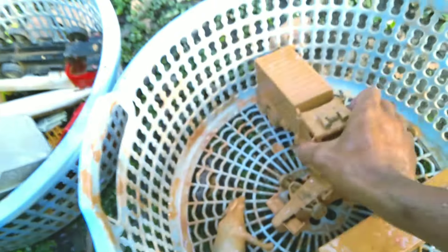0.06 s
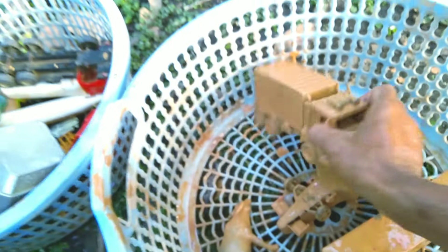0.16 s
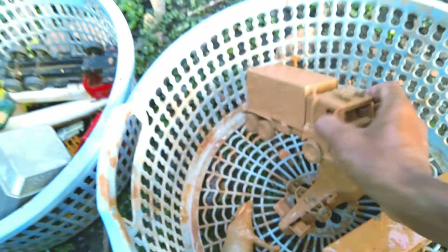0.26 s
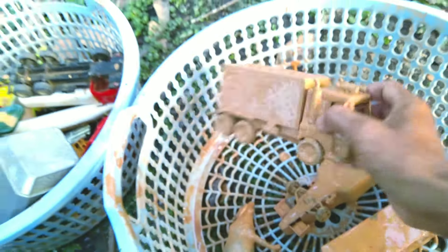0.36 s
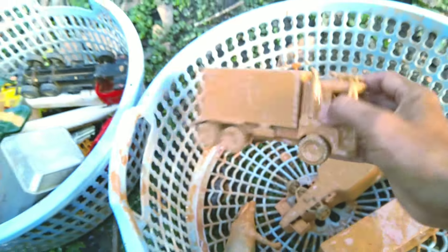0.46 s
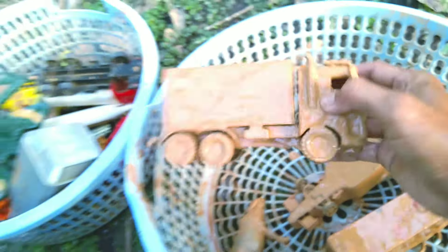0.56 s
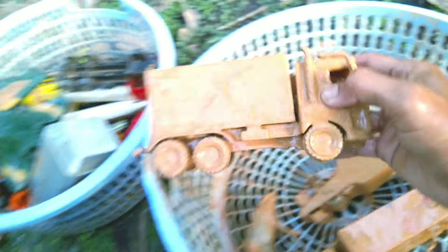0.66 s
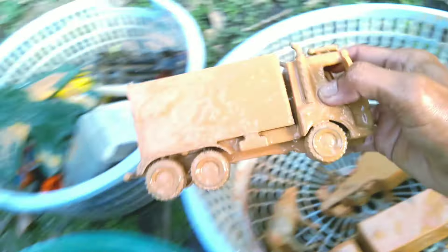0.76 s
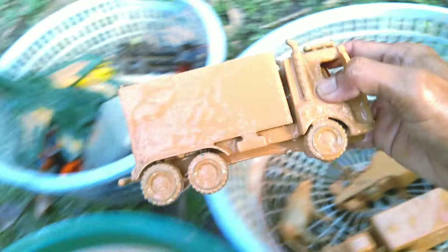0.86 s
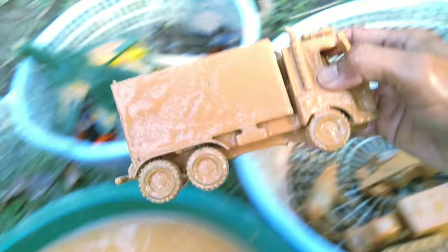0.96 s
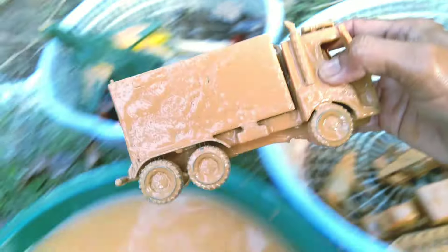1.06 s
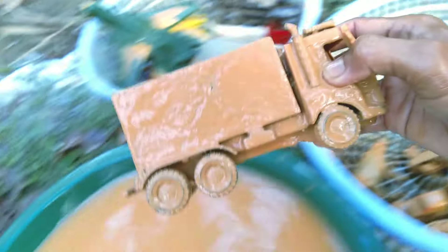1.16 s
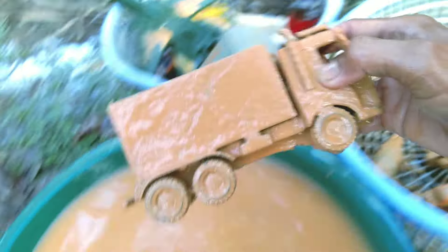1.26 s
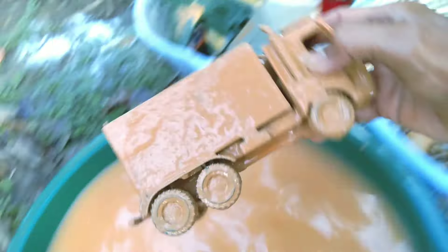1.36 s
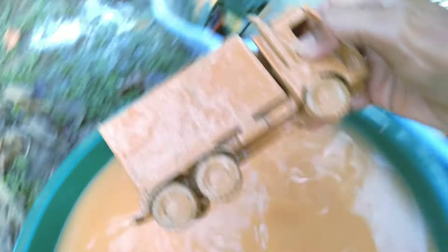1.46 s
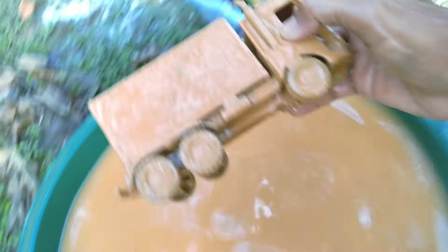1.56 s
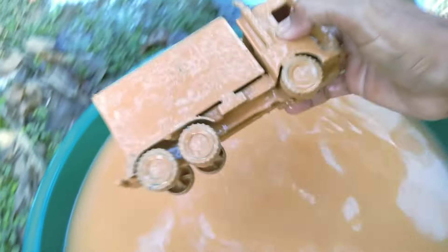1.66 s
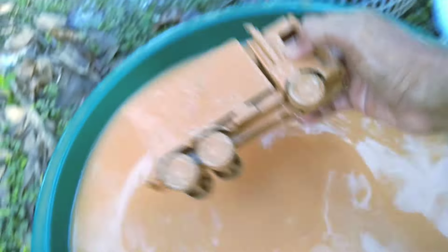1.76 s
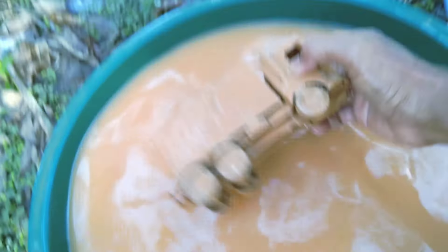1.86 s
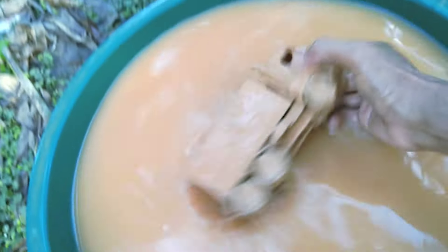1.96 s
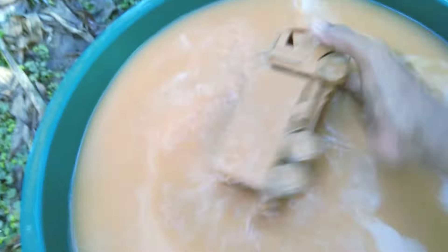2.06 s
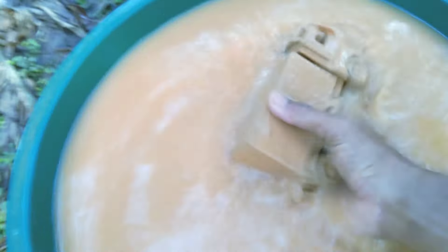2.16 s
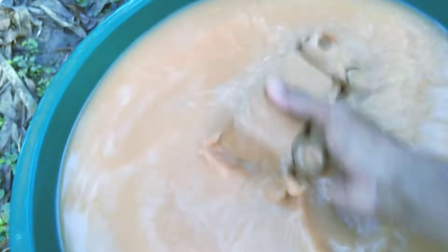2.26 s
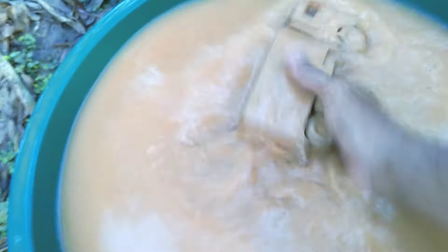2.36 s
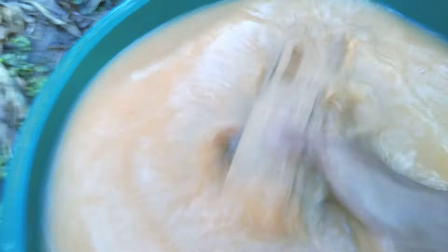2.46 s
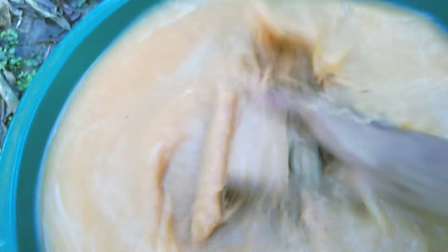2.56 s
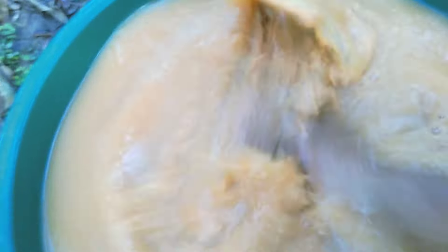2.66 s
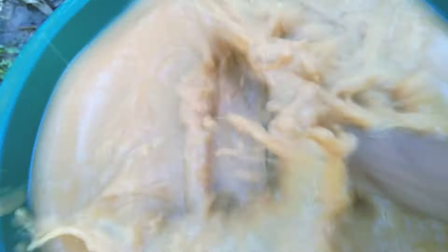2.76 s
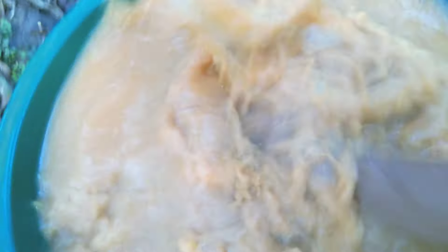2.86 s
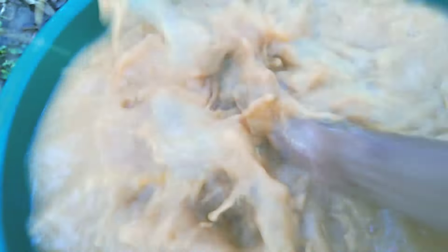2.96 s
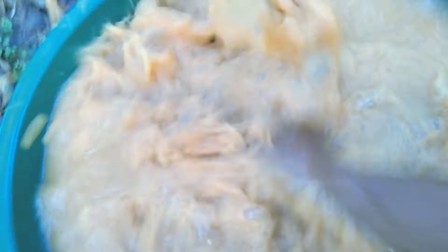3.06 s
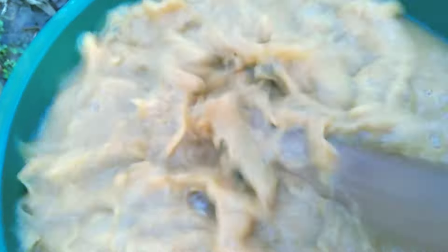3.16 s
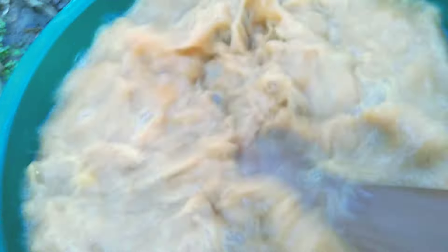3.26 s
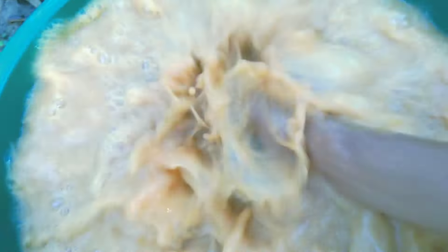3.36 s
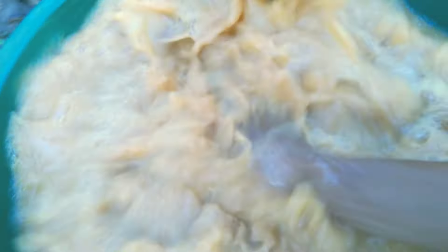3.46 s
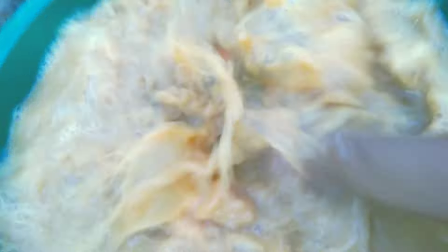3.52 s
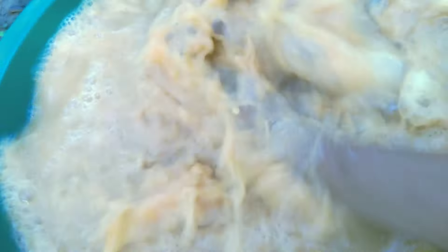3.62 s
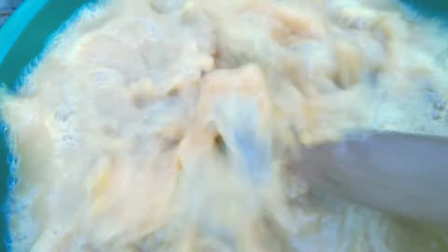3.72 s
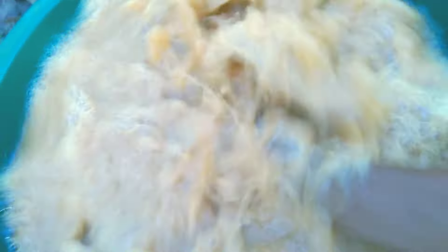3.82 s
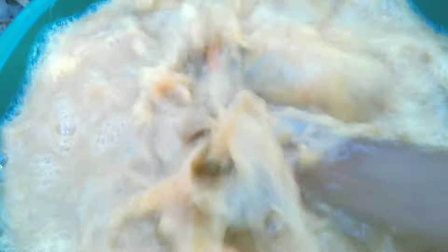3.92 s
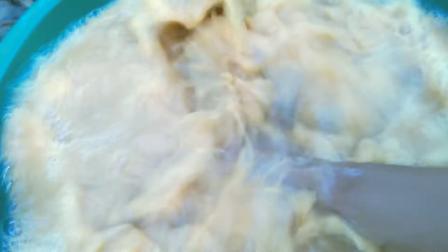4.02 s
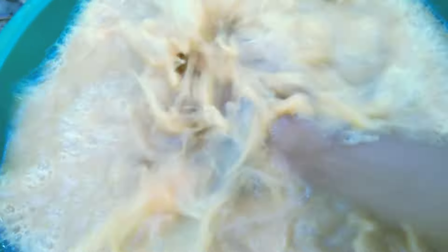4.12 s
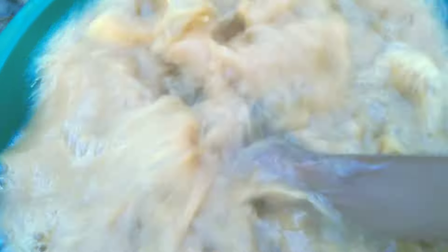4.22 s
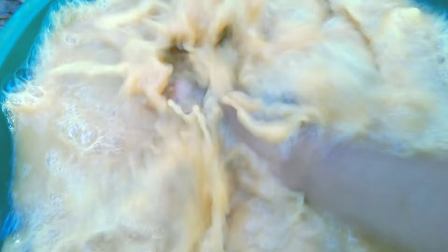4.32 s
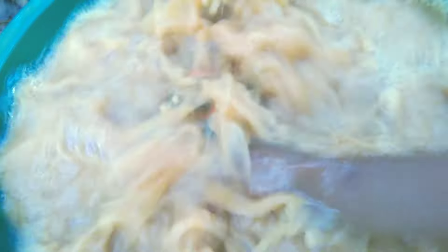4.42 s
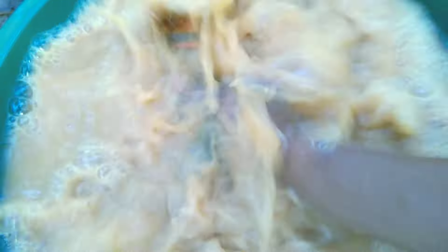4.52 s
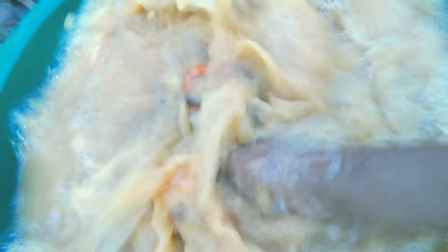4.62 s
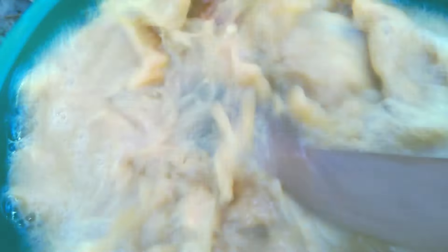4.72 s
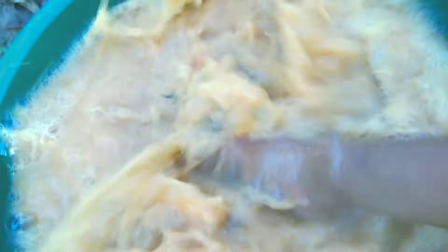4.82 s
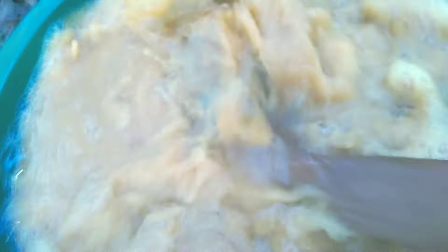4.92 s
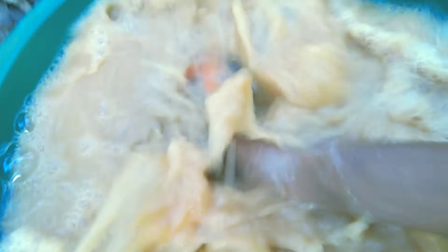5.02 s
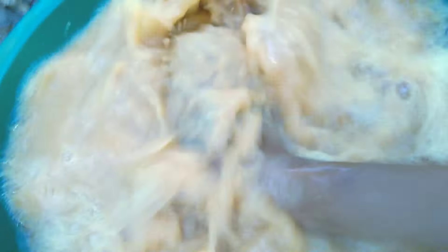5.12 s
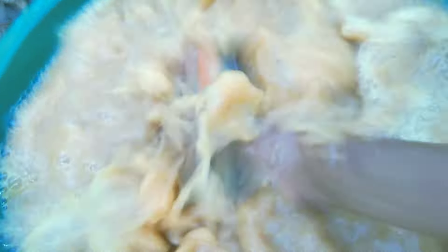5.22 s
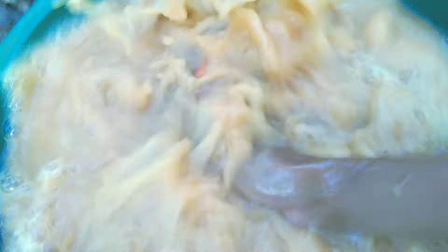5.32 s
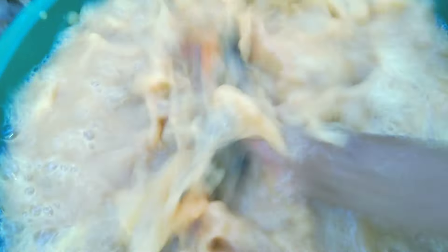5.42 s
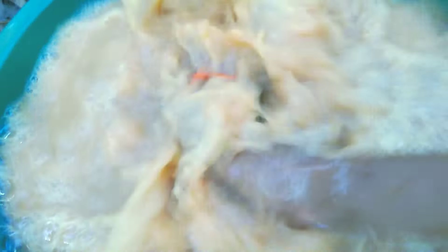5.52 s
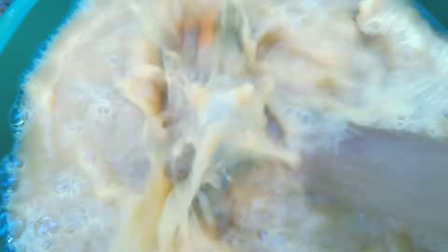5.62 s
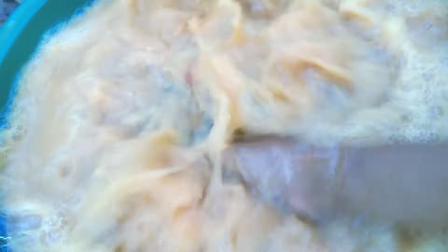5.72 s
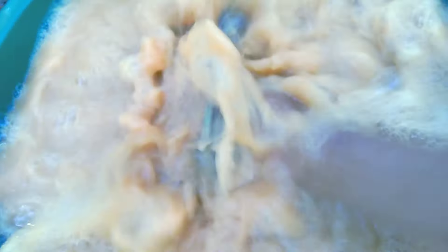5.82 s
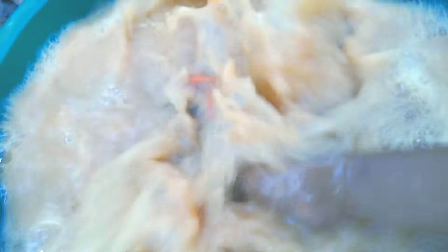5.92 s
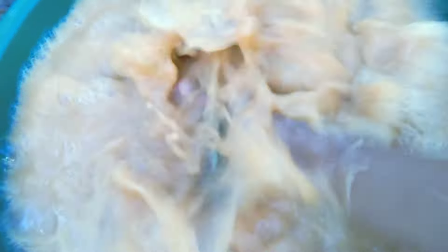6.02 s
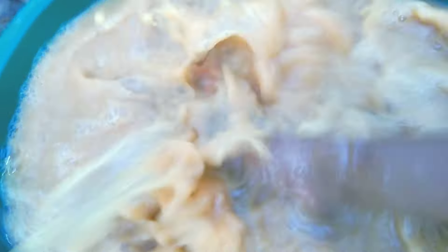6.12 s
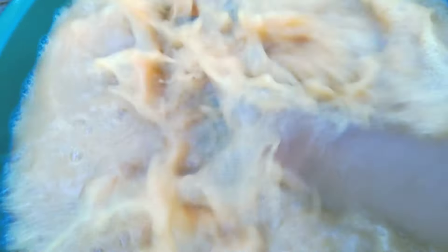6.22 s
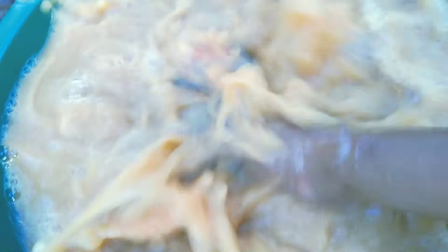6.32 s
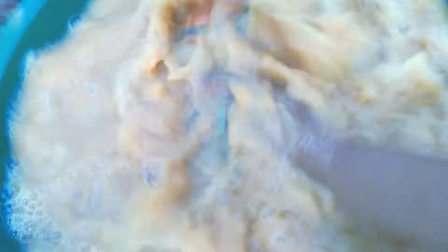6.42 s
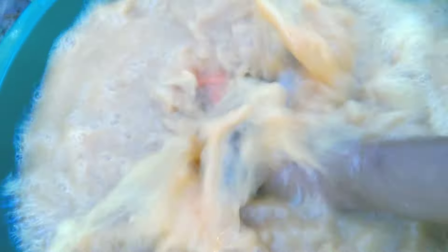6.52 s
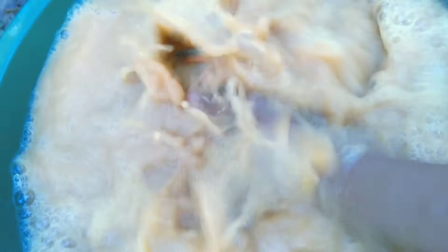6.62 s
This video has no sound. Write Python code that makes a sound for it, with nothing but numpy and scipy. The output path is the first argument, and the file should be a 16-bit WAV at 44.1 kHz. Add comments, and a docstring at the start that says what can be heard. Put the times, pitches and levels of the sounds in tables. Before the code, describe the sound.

A soft plastic scrape with one small snag opens over far birdsong and low outdoor rumble. After two seconds of near calm, a sharp slap of water marks the dip, followed by light drips and glugs. Then vigorous scrubbing in a full basin takes over, dense bubbling, heavy sloshes and hissing spray in uneven bursts, close, loud and mono, still going when it stops.

```python
"""Outdoors, at a basin: a muddy plastic toy is dragged from a basket, dipped and shaken. Close to the single
microphone, slaps, glugs and spray are damped bubble tones mixed with coloured noise. The basket's drag is
patchy noise with one snag. Far off, small birds are gliding sines heard through echoes. Behind them lie rumble,
a far rush, brief low tones and the high buzz of an insect flying by."""
import sys
import numpy as np
from scipy import signal
from scipy.fft import rfft, irfft, next_fast_len
from scipy.io import wavfile
from scipy.ndimage import uniform_filter1d, map_coordinates

SR = 44100
rng = np.random.default_rng(int(sys.argv[2]) if len(sys.argv) > 2 else 0)


def generate_wav(sig):
    """Save sig (samples, or channels by samples) to the path in sys.argv[1] as 16-bit PCM at SR."""
    pcm = np.round(np.clip(np.atleast_2d(sig).T, -1, 1) * 32767).astype(np.int16)
    wavfile.write(sys.argv[1], SR, pcm)


N = 294588
T = np.arange(N) / SR

# Unrest of the water, before trims and flutter:
# [t/s, gurgle level/dB, splash level/dB, spray level/dB]
WATER_UNREST = [(2.01, -62, -53, -55), (2.05, -50.5, -50.5, -41), (2.16, -50, -50, -53),
                (2.21, -40, -51, -52), (2.27, -39, -43, -48), (2.33, -42, -38, -46),
                (2.43, -44, -45.5, -57), (2.55, -40.5, -34.5, -53), (2.61, -41, -40, -46),
                (2.66, -35.5, -32, -38), (2.72, -32, -32, -42), (2.83, -28.5, -24, -27.5),
                (3.0, -22, -28, -24.5), (3.12, -29, -28.5, -30), (3.35, -23, -25.5, -27.5),
                (3.8, -22, -23, -25.5), (4.3, -24, -26.5, -26.5), (4.46, -23.5, -24.5, -29),
                (4.74, -23, -24, -27), (5.04, -24, -25.5, -25), (5.42, -23, -23, -26.5),
                (5.9, -22.5, -24, -24), (6.68, -24, -24.5, -28)]


def water():
    """Water shaken in the basin: noise and bubbles share one unrest, and splash and spray share spurts."""
    gurgle_gain, splash_gain, spray_gain = gains(WATER_UNREST)
    sheet_splash, sheet_spray = sheets()
    spurt = spurts(count=800, last=0.0014, scatter_db=2.5)
    out = surge(gurgle_gain) + heaves() + gurgle(gurgle_gain)
    out += splash(np.hypot(splash_gain, sheet_splash), spurt)
    out += spray(np.hypot(spray_gain, sheet_spray), spurt)
    return out + slaps() + glugs() + slosh()


# Drops and sheets landing: [t/s, nominal peak level/dB, f/Hz]
LANDINGS = [(2.0161, -0.5, 3400), (2.0197, -10, 2050), (2.0587, -29, 7490), (2.0807, -27, 4500),
            (2.0946, -24, 3900), (2.1161, -24, 1490), (2.1486, -32, 4700), (2.1665, -15, 1960),
            (2.1847, -9, 7600), (2.1904, -13, 1810), (2.2338, -23, 5360), (2.2518, -14, 2380),
            (2.2668, -5.5, 2640), (2.2796, -12, 7960), (2.3156, -15, 1380), (2.364, -23, 4180),
            (2.4157, -30, 5200), (2.4673, -24, 4100), (2.5127, -20, 3680), (2.5277, -15.5, 3140),
            (2.535, -13, 3240), (2.5636, -8.5, 1990), (2.711, -7, 5600), (2.73, -7, 7250),
            (2.7444, -3.5, 3150), (2.75, -2, 3140), (2.7623, -15, 8030), (2.778, -3.5, 1480),
            (2.865, -7.5, 1690), (2.9077, -4.5, 1440), (2.9402, -13, 4030), (2.957, -2, 2460),
            (2.976, -1, 7230), (2.995, 2, 5560), (3.0587, 2, 1900), (3.0708, 0, 2540), (3.1517, -1, 2120),
            (3.1694, -5, 6300), (3.2145, -2.5, 7100), (3.247, -7, 2040), (3.269, -4, 1490),
            (3.3182, -6, 2590), (3.3503, -7, 1400), (3.4638, -0.5, 1580), (3.5842, -9, 5230),
            (3.6195, -10, 3600), (3.6737, -2, 1530), (3.8869, 1.5, 7830), (3.924, -6, 1990),
            (3.948, -3.5, 7460), (4.013, -5, 6600), (4.0726, -21, 1460), (4.212, -2, 1420),
            (4.2564, 0, 1730), (4.3016, -10, 1900), (4.3904, -18, 1710), (4.4834, -2, 7460),
            (4.5002, -7, 1710), (4.562, -5.5, 5530), (4.6019, -11, 7500), (4.6843, -4, 2340),
            (4.7574, -4, 7000), (4.785, -12, 1420), (4.87, -19, 1470), (4.9448, -3.5, 6960),
            (5.0372, -6, 2180), (5.1313, -4, 2180), (5.1943, -1, 1970), (5.2068, -5, 2090),
            (5.233, -9, 2130), (5.268, -7, 1900), (5.4316, -2, 1880), (5.5455, -6, 4660),
            (5.5628, -7, 3570), (5.577, -8, 2020), (5.747, -14, 3560), (5.8164, -24, 3420),
            (5.8845, -7.5, 3000), (6.0056, -0.5, 1630), (6.0312, -8, 3740), (6.076, -5.5, 3200),
            (6.1363, -9, 2130), (6.2136, -4, 4200), (6.2305, -0.5, 3440), (6.2977, -1.5, 3760),
            (6.339, -6, 2040), (6.4203, -8, 1700), (6.4617, -1.5, 7200), (6.5078, -0.5, 7500),
            (6.5715, -2.5, 7670)]


def slaps():
    """A landing drop rings briefly inside a puff of noise."""
    ring_t60 = 0.011  # s
    rows = [(*row, ring_t60) for row in LANDINGS]
    dry_slaps = bursts(rows, cycles=90, swell=1.0, tone_db=-4.5, hiss_db=-4.5)
    return filtered(dry_slaps, lambda f: band(900, 8500)(f) ** 0.68)


# Large bubbles: [t/s, nominal peak level/dB, f/Hz, t60/s]
LARGE_BUBBLES = [(2.038, -25, 721, 0.04), (2.091, -23.5, 540, 0.039), (2.125, -30.5, 786, 0.044),
                 (2.204, -20, 703, 0.046), (2.236, -23, 394, 0.048), (2.267, -11, 620, 0.043),
                 (2.314, -17.5, 1170, 0.031), (2.327, -24, 440, 0.048), (2.364, -24, 530, 0.043),
                 (2.631, -21, 824, 0.039), (2.662, -15.5, 410, 0.048), (2.716, -12, 1190, 0.048),
                 (2.747, -18, 1010, 0.066), (2.813, -10.5, 590, 0.039), (2.909, -11, 745, 0.057),
                 (2.962, -6, 885, 0.034), (3.024, -6, 610, 0.051), (3.048, -11, 840, 0.055),
                 (3.132, -11, 603, 0.036), (3.26, -11.5, 885, 0.048), (3.311, -31, 900, 0.06),
                 (3.39, -9, 620, 0.043), (3.547, -4.5, 640, 0.042), (3.656, -20, 600, 0.048),
                 (3.701, -13, 660, 0.048), (3.737, -7, 410, 0.083), (3.887, -6.5, 1050, 0.029),
                 (3.975, -4.5, 545, 0.043), (4.106, -9.5, 940, 0.048), (4.152, -7, 558, 0.063),
                 (4.188, -5, 865, 0.035), (4.213, -5, 480, 0.04), (4.257, -3.5, 787, 0.04),
                 (4.303, -3, 530, 0.043), (4.342, -3.5, 540, 0.06), (4.373, -1, 477, 0.042),
                 (4.391, -6.5, 824, 0.042), (4.485, -8, 694, 0.042), (4.527, -7, 496, 0.046),
                 (4.678, -7.5, 403, 0.06), (4.714, -4.5, 580, 0.042), (4.74, -4, 810, 0.032),
                 (4.772, -11, 480, 0.053), (4.841, -8.5, 860, 0.04), (4.894, -8.5, 656, 0.065),
                 (5.036, -10.5, 893, 0.041), (5.081, -5, 582, 0.041), (5.126, -6, 647, 0.038),
                 (5.266, -3.5, 638, 0.039), (5.331, -9.5, 973, 0.039), (5.422, -7.5, 468, 0.037),
                 (5.449, -4.5, 636, 0.045), (5.502, -10, 815, 0.058), (5.562, -15, 1023, 0.054),
                 (5.621, -6.5, 806, 0.05), (5.701, -4, 420, 0.048), (5.814, -5, 445, 0.048),
                 (5.972, -10.5, 886, 0.045), (6.002, -7, 625, 0.038), (6.131, -9, 900, 0.067),
                 (6.163, -9.5, 710, 0.053), (6.219, -12.5, 373, 0.067), (6.264, -5.5, 615, 0.04),
                 (6.326, -7.5, 610, 0.036), (6.407, -10, 646, 0.069), (6.53, -6.5, 770, 0.039),
                 (6.576, -10, 410, 0.061), (6.604, -8.5, 640, 0.053), (6.67, -6, 427, 0.048)]


def glugs():
    """A large bubble sounds as a damped tone of rising pitch with a little noise."""
    return bursts(LARGE_BUBBLES, cycles=60, swell=1.7, tone_db=-0.5, hiss_db=-12)


def gurgle(gain):
    """Mid-sized bubbles over noise; each large bubble stirs up more of them."""
    stirred = swells(LARGE_BUBBLES, over_db=-17, rise=0.0035, fall=0.015)
    swarm = bubbles(count=3400, hz=760, spread=0.4006, cycles=16.1, scatter_db=3.0, size=2000)
    noise = hiss(water_colour(314, 1940), patchy_db=6.5)
    flutter = amp(-1.5 + 1.55 * wobble(40) + 0.8 * wobble(13))
    return np.hypot(gain, stirred) * flutter * (amp(-2.5) * swarm + amp(-3) * noise)


def splash(gain, spurt):
    """Small bubbles and brighter noise, thrown up in spurts."""
    swarm = bubbles(count=7000, hz=2732, spread=0.4845, cycles=15, scatter_db=4.0, size=600)
    noise = hiss(water_colour(1050, 7500), patchy_db=2)
    thrown = gain * amp(-1.5 + 1.1 * wobble(22)) * (0.97 + 0.32 * spurt)
    return thrown * (amp(-3.5) * swarm + amp(-3) * noise)


def spray(gain, spurt):
    """Tiny bubbles fizz within high noise, and the finest foam bursts as a steadier hiss above."""
    gain = gain * amp(0.27 * wobble(11))
    fizz = bubbles(count=12000, hz=7300, spread=0.2, cycles=12, scatter_db=5, size=200)
    noise = hiss(water_colour(3600, 18000), patchy_db=5.5)
    top = amp(-1.5) * (0.64 + 0.47 * spurt) * (amp(-5.4) * fizz + amp(-1.5) * noise)
    mist = amp(-18) * (0.94 + 0.28 * spurt) * hiss(band(10500, 15000), patchy_db=3.5)
    return gain * (top + mist)


# Sheets of water flung up, at their fullest before trims:
# [t/s, splash level/dB, spray level/dB, half width at 1/e of the gain/s]
FLUNG_SHEETS = [(2.025, -33, -40, 0.011), (2.095, -44, -36, 0.01), (2.19, -35, -43.5, 0.0093),
                (2.274, -26, -23.5, 0.01), (2.53, -45, -38.5, 0.029), (2.666, -28.5, -28, 0.028),
                (2.757, -21.5, -16.5, 0.031), (2.972, -21, -16.5, 0.03), (3.067, -19.5, -41, .02),
                (3.167, -23, -18.5, 0.014), (3.273, -20, -19, 0.012), (3.463, -26, -21, 0.009),
                (3.588, -22, -25.5, 0.03), (3.888, -30, -37, 0.014), (4.03, -24, -19.5, 0.015),
                (4.222, -17.5, -26, 0.014), (4.323, -30, -24.5, 0.018), (4.402, -32, -22, 0.028),
                (4.502, -19.5, -20, 0.013), (4.599, -20, -19.5, 0.013), (4.69, -20.5, -27, .015),
                (4.8, -23, -22.5, 0.024), (4.871, -23, -23, 0.043), (5.06, -20.5, -31, .02),
                (5.242, -21, -21.5, 0.057), (5.572, -23, -22.5, 0.028), (5.82, -32, -35, 0.01),
                (6.005, -23, -21, 0.018), (6.218, -32, -17, 0.0077), (6.3, -25, -32, 0.012),
                (6.46, -23.5, -26, 0.011), (6.583, -21, -20.5, 0.034)]


def sheets():
    """Splash and spray gains swell and sink smoothly with each sheet."""
    total = 0
    for s, splash_db, spray_db, width in FLUNG_SHEETS:
        total = total + amp([[splash_db], [spray_db]]) * np.exp(-((T - s) / width) ** 2)
    return total


def surge(gurgle_gain):
    """Low water noise follows the gurgle, but falls away faster when the churn is weak."""
    full_db, surge_db, growth = -17, -11, 1.28  # full churn; level over it; exponent
    gain = amp(full_db + surge_db) * (gurgle_gain / amp(full_db)) ** growth
    return gain * amp(-1.0 + 1.17 * wobble(13)) * hiss(water_colour(30, 267), patchy_db=0.5)


# The whole basinful heaves: [t/s, level/dB before a common trim]
BASIN_HEAVES = [(2.659, -23), (2.962, -22), (3.163, -26), (3.276, -14.5), (3.543, -25), (3.968, -31),
                (4.147, -19), (4.234, -23), (4.298, -29), (4.395, -25), (4.687, -23), (4.76, -26),
                (4.856, -16), (5.051, -15), (5.127, -23.5), (5.24, -15.5), (5.426, -28), (5.518, -16),
                (5.607, -17), (5.698, -21.5), (5.798, -11), (5.885, -19), (5.998, -23), (6.183, -26),
                (6.385, -16), (6.573, -12)]


def heaves():
    """Each heave of the basinful is a short swell of low noise."""
    gain = swells(BASIN_HEAVES, over_db=-7.5, rise=0.0058, fall=0.015)
    return gain * hiss(band(128, 356), patchy_db=0.5)


# Water rocking in the basin after the dip: [t/s, level/dB]
BASIN_ROCKING = [(2.17, -66), (2.23, -41), (2.45, -47.5), (2.62, -39), (2.7, -60)]


def slosh():
    """Rocking water swells as a narrow band of low noise."""
    return gains(BASIN_ROCKING)[0] * hiss(lambda f: band(270, 420)(f) ** 2, patchy_db=2.5)


# Colour of the moving water: [f/Hz, relative level/dB per Hz]
WATER_SPECTRUM = [(15, -60), (25, -21), (73, -3), (160, -7), (215, 1.5), (313, -8), (410, 4.5), (848, 5.5),
                  (1340, -10), (1490, -6.5), (2770, -8.5), (3530, -9.5), (6050, -16), (7500, -10.5),
                  (15500, -51)]


def water_colour(lo_hz, hi_hz):
    """The water's spectrum, limited to one band."""
    return lambda f: amp(along(WATER_SPECTRUM, f)) * band(lo_hz, hi_hz)(f)


# The toy dragging over the basket, before trims: [t/s, knock level/dB, rustle level/dB]
BASKET_DRAG = [(0, -74, -80), (.165, -78, -82), (.22, -52, -60), (.245, -47.5, -63), (.33, -60, -60),
               (.45, -73, -69), (.5, -75, -76)]
# Its one snag, before trims: [t/s, nominal peak level/dB, t60/s]
BASKET_SNAG = [(0.335, -23.5, 0.088)]


def lift():
    """Wet plastic over the basket's mesh: spurting knocks, a rustle and one snag ringing at two pitches."""
    knock_gain, rustle_gain = gains(BASKET_DRAG)
    spurt = spurts(count=260, last=0.008, scatter_db=3)
    knocks = hiss(lambda f: band(480, 850)(f) ** 2, patchy_db=3) * (0.6 + 0.6 * spurt)
    rustle = amp(-6.0) * hiss(band(1000, 14000), patchy_db=4.0)
    snag = np.zeros(N)
    for hz in (950, 7000):
        rows = [(s, db, hz, t60) for s, db, t60 in BASKET_SNAG]
        snag += bursts(rows, cycles=35, swell=0.45, tone_db=-13, hiss_db=-9.5)
    return knock_gain * knocks + rustle_gain * rustle + filtered(snag, band(1100, 7600))


# Far bird notes: [t/s, length/s, start f/Hz, end f/Hz, level/dB rms over the first 0.1 s]
BIRD_NOTES = [(-.06, .027, 4880, 2810, -48), (0.08, .034, 4430, 5180, -51), (0.115, 0.033, 4370, 2970, -45),
              (0.206, .017, 7960, 6800, -52), (0.263, 0.052, 3730, 4900, -52.5),
              (.346, 0.059, 3170, 2380, -51.5), (0.391, 0.031, 4350, 5460, -50.5),
              (0.448, 0.04, 7070, 5280, -46.5), (0.482, .038, 3300, 4330, -54.5),
              (0.51, 0.023, 4170, 4900, -51), (0.568, 0.013, 3120, 2880, -51.5),
              (0.631, 0.017, 2940, 2040, -55), (.641, 0.028, 3270, 3920, -51),
              (0.673, 0.027, 4780, 5900, -45), (0.886, 0.079, 3270, 5600, -42),
              (.94, 0.023, 3530, 3520, -55), (1.082, 0.035, 3160, 2415, -48.5),
              (1.13, 0.03, 3200, 2030, -57), (1.244, 0.055, 5840, 5730, -64),
              (1.254, 0.043, 7300, 7600, -70), (1.337, 0.16, 3630, 4940, -48),
              (1.342, 0.047, 3060, 3730, -52.5), (1.38, .04, 4700, 5560, -47),
              (1.423, 0.029, 3950, 4970, -45), (1.473, 0.026, 7300, 6300, -52.5),
              (1.518, 0.04, 4910, 3390, -47), (1.567, 0.036, 3270, 2720, -48),
              (1.589, 0.033, 5940, 4930, -55), (1.62, 0.024, 2940, 2220, -58),
              (1.646, .04, 3500, 3900, -50), (1.776, 0.051, 2900, 4970, -42.5),
              (1.811, 0.012, 2900, 2700, -51.5), (1.838, 0.028, 5530, 6280, -53),
              (1.88, 0.027, 4150, 5400, -53)]
# Echo of a note: [f/Hz, typical t60/s after the hold]
NOTE_ECHO = [(2300, 0.15), (3000, 0.37), (3600, 0.46), (5000, 0.29), (7000, 0.23)]


def birds():
    """Each note is a gliding whistle, heard through its echoes."""
    lead = SR // 10  # room for the note that starts before the opening
    out = np.zeros(N + 2 * SR)
    for s, length, start_hz, end_hz, db in BIRD_NOTES:
        u = np.linspace(0, 1, max(int(length * SR), 8))
        glide = start_hz + (end_hz - start_hz) * u
        note = np.sin(2 * np.pi * np.cumsum(glide) / SR) * np.sin(np.pi * u) ** 0.4
        t60 = along(NOTE_ECHO, (start_hz + end_hz) / 2)
        heard = signal.fftconvolve(note, echoes(t60, hold=0.011))
        out[round(s * SR) + lead:][:len(heard)] += amp(db) * heard / np.std(heard[:SR // 10])
    return out[lead:][:N]


def echoes(t60, hold):
    """The echo tail holds, then each narrow band fades at its own, quickening speed."""
    hz, t, z = signal.stft(rng.standard_normal(SR * 3 // 4), SR, nperseg=512)
    own_t60 = t60 * np.exp(0.16 * rng.standard_normal((len(hz), 1)))
    uneven_db = rng.normal(0, 5.5, own_t60.shape)
    fade_db = -60 * (np.maximum(t - hold, 0) / own_t60) ** 2.22
    return signal.istft(z * amp(uneven_db + fade_db), SR, nperseg=512)[1]


# Insect flying by: [t/s, level/dB]
INSECT_PASS = [(.46, -86), (.52, -71), (.99, -69), (1.09, -95)]
# Its buzz bands: [centre f/Hz, full width at 1/e/Hz, relative level/dB]
WING_BANDS = [(11500, 670, 5), (12200, 500, 4), (13700, 1400, -3), (14900, 800, -8)]


def insect():
    """Wing buzz as noise in a few high bands, growing and fading as it passes."""
    def buzz(f):
        return sum(amp(db) * np.exp(-(2 * (f - c) / w) ** 2) for c, w, db in WING_BANDS)
    return gains(INSECT_PASS)[0] * hiss(buzz, patchy_db=2)


# Brief low tones: [t/s, length/s, f/Hz, level/dB], level and pitch wavering about these
LOW_TONES = [(0, 0.22, 1250, -58), (0.304, 0.25, 1210, -58), (0.17, 0.042, 98, -33),
             (0.903, 0.31, 100.9, -46.5), (1.562, 0.1, 101, -45), (1.923, .14, 293, -40),
             (2.662, 0.25, 94, -44), (6.06, 0.34, 82, -39), (6.523, 0.22, 83.3, -32.5)]


def low_tones():
    """Soft-edged sines that waver in level and pitch."""
    out = np.zeros(N)
    for s, length, hz, db in LOW_TONES:
        edge = np.clip(np.minimum(T - s, s + length - T) / 0.037, 0, 1)
        phase = 2 * np.pi * np.cumsum(hz * (1 + 0.012 * wobble(6))) / SR
        out += amp(db + 2 * wobble(12)) * edge * np.sin(phase)
    return out


# Open air: [t/s, rumble level/dB, far rush level/dB]
AIR_LEVELS = [(0, -56, -57), (.11, -55, -55.5), (.31, -57, -48), (.53, -48.5, -62.5), (.94, -60.5, -62),
              (1.08, -49.5, -66.5), (1.51, -52, -63.5), (1.84, -51, -70), (2.3, -53, -74), (2.6, -61, -68)]
# Colour of the rumble: [f/Hz, relative level/dB per Hz]
RUMBLE_SPECTRUM = [(15, -43), (25, -4), (70, -5.5), (102, 1), (129, -11), (188, -10), (231, -22.5),
                   (357, -20.5), (389, -21), (480, -39), (620, -59), (1060, -120)]
# Colour of the far rush: [f/Hz, relative level/dB per Hz]
RUSH_SPECTRUM = [(500, -14), (800, -11), (1000, 0), (1400, -1), (1750, -13), (5000, -20), (6200, -15),
                 (7000, -25), (10000, -27), (11000, -44), (15000, -46)]


def air():
    """Rumble and a far rush, each a patchy coloured noise of changing level."""
    rumble_gain, rush_gain = gains(AIR_LEVELS)
    rumble = hiss(lambda f: amp(along(RUMBLE_SPECTRUM, f)), patchy_db=5, size=2048)
    rush = hiss(lambda f: amp(along(RUSH_SPECTRUM, f)), patchy_db=5, size=2048)
    return rumble_gain * rumble + rush_gain * rush


def bubble(t, hz, t60, rise, swell):
    """A damped sine that swells over some cycles; its pitch climbs as the bubble nears the surface."""
    phase = 2 * np.pi * hz * t * (1 + rise * np.minimum(t / t60, 1))
    return np.sin(phase) * amp(-60 * t / t60) * (1 - np.exp(-hz * t / swell))


def bubbles(count, hz, spread, cycles, scatter_db, size):
    """A swarm of random bubbles from 2 s on, of rms 1 there: log-normal pitch, uneven life and level."""
    draw = rng.standard_normal((count, 3))
    pitch = np.clip(hz * np.exp(spread * draw[:, :1]), 60, 10000)
    life = cycles * np.exp(0.49 * draw[:, 1:2]) / pitch
    level = amp(scatter_db * np.clip(draw[:, 2:], -3, 2))
    rows = bubble(np.arange(size) / SR, pitch, life, rise=0.21, swell=0.93) * level
    at = rng.integers(2 * SR, N, (count, 1)) + np.arange(size)
    x = np.bincount(at.ravel(), rows.ravel(), N + size)[:N]
    return x / np.std(x[2 * SR:])


def bursts(rows, cycles, swell, tone_db, hiss_db):
    """Each event is a bubble tone inside a puff of noise centred on its pitch; cycles caps the ring."""
    out, t = np.zeros(N + SR), np.arange(SR // 10) / SR
    for s, db, hz, t60 in rows:
        t60 = np.clip(t60, 0.003, 0.09)
        noise = rng.standard_normal(len(t))
        near = signal.lfilter(*signal.iirpeak(hz, 1.2, SR), noise)
        envelope = amp(-60 * t / t60) * (1 - np.exp(-t / 0.00085))
        puff = (near / np.std(near) + 0.12 * noise) * envelope
        ring = bubble(t, hz, min(t60, cycles / hz), rise=0.087, swell=swell)
        out[round(s * SR):][:len(t)] += amp(db) * (amp(tone_db) * ring + amp(hiss_db) * puff)
    return out[:N]


def spurts(count, last, scatter_db):
    """Random kicks, each a sudden rise and a quick fall over `last` seconds; rms 1."""
    kick_gain = amp(scatter_db * np.clip(rng.standard_normal(count), -3, 2))
    kicks = np.bincount(rng.integers(0, N, count), kick_gain, N)
    t = np.arange(SR // 20) / SR
    shape = np.exp(-t / last) * (1 - np.exp(-t / 0.000093))
    return unit(signal.fftconvolve(kicks, shape)[:N])


def swells(rows, over_db, rise, fall):
    """A gain that swells and sinks at each event, with rise and fall in seconds."""
    kicks, t = np.zeros(N), np.arange(SR // 4) / SR
    for s, db, *_ in rows:
        kicks[min(round(s * SR), N - 1)] += amp(db + over_db)
    shape = np.exp(-t / fall) * (1 - np.exp(-t / rise))
    return signal.fftconvolve(kicks, shape / shape.max())[:N]


def hiss(response, patchy_db, size=256):
    """Coloured noise of rms 1 with patches of random gain; a larger size makes them long and narrow."""
    z = signal.stft(rng.standard_normal(N), nperseg=size)[2]
    field = uniform_filter1d(rng.standard_normal(z.shape), size=5, axis=0)  # across frequency
    field = uniform_filter1d(field, size=6, axis=1)  # across time
    patchy = signal.istft(z * amp(patchy_db * unit(field)), nperseg=size)[1][:N]
    return unit(filtered(patchy, response))


def filtered(x, response):
    """x with its spectrum multiplied by a response of frequency."""
    m = next_fast_len(N + 8192)
    return irfft(rfft(x, m) * response(np.fft.rfftfreq(m, 1 / SR)), m)[..., :N]


def band(lo_hz, hi_hz):
    """Soft-edged pass band."""
    return lambda f: 1 / np.sqrt((1 + (lo_hz / (f + 1)) ** 8) * (1 + (f / hi_hz) ** 8))


def along(points, hz):
    """Values of (f/Hz, value) points, interpolated on a log frequency axis."""
    f, v = np.transpose(points)
    return np.interp(np.log(hz + 1), np.log(f + 1), v)


def gains(rows):
    """One gain per sample for each dB column, at -140 dB outside the table."""
    s, *cols = np.transpose(rows)
    return [amp(np.interp(T, s, c, -140, -140)) for c in cols]


def wobble(rate):
    """A smooth random curve, rate knots a second."""
    return map_coordinates(rng.standard_normal(int(N * rate / SR) + 4), [T * rate])


def amp(db):
    """Decibels to a linear gain."""
    return 10 ** (np.asarray(db) / 20)


def unit(x):
    """x scaled to rms 1."""
    return x / np.sqrt(np.mean(x ** 2) + 1e-20)


def scene():
    """One microphone feeds both channels."""
    mono = water() + lift() + birds() + insect() + low_tones() + air()
    return np.array([mono, mono])


def record(dry):
    """The microphone drops the deepest bass, rounds the loudest peaks and keeps nothing above its limit."""
    bass_hz, ceiling, top_hz = 40, 0.95, 15600
    soft = filtered(dry, lambda f: f ** 2 / (f ** 2 + bass_hz ** 2))
    soft = soft / (1 + np.abs(soft / ceiling) ** 6) ** (1 / 6)
    return filtered(soft, lambda f: f < top_hz)


dry = scene()
out = record(dry)
generate_wav(out)
```